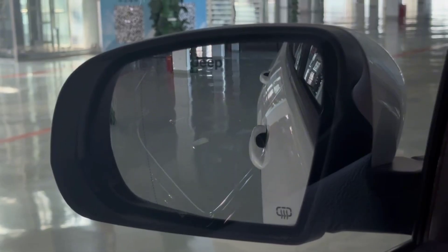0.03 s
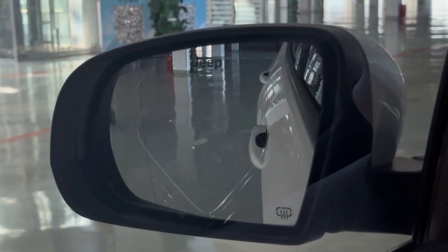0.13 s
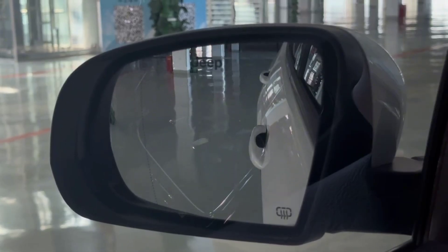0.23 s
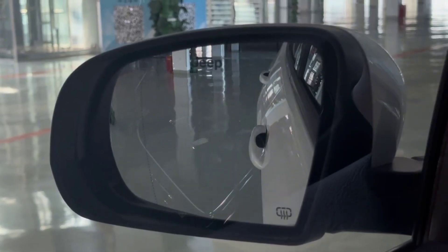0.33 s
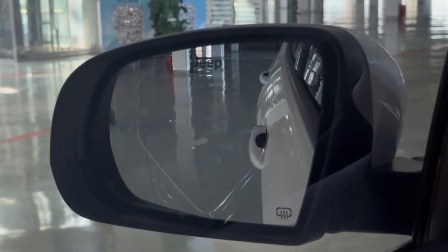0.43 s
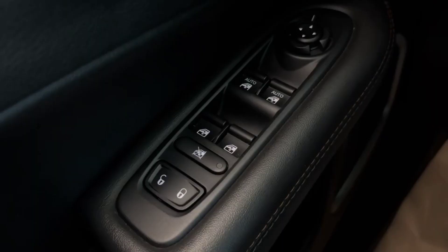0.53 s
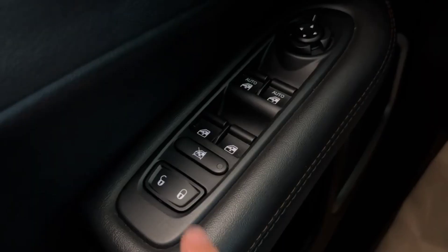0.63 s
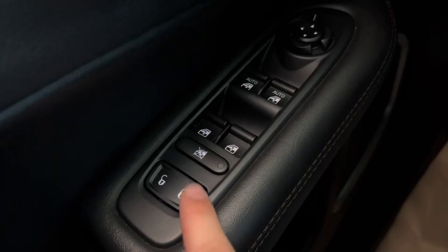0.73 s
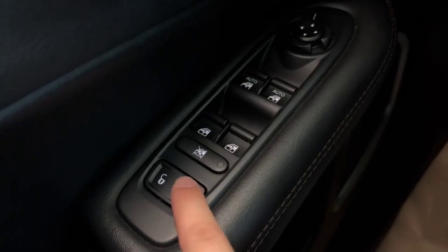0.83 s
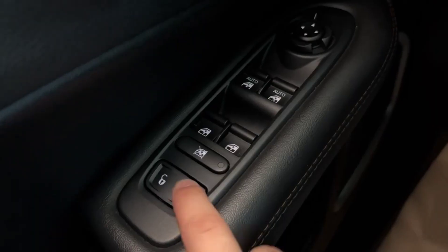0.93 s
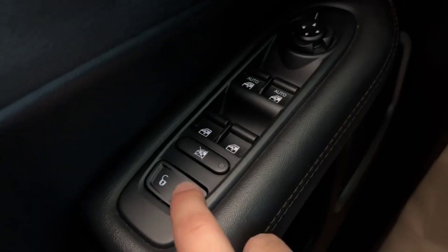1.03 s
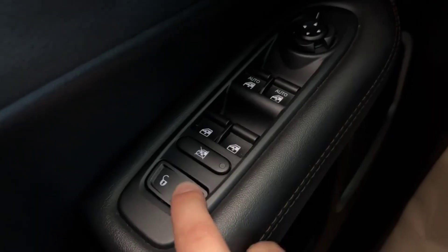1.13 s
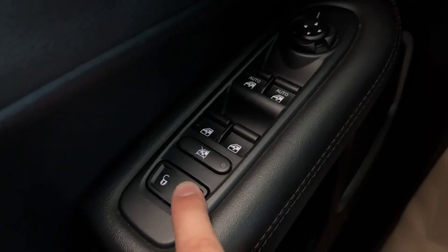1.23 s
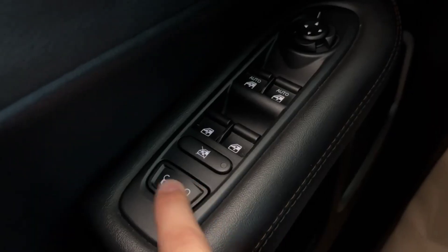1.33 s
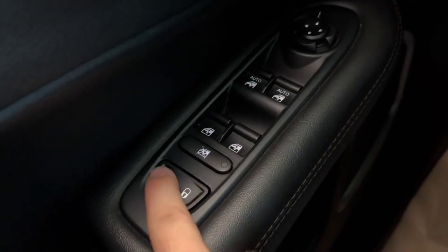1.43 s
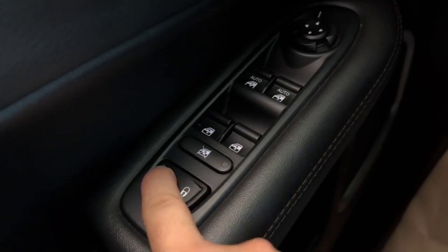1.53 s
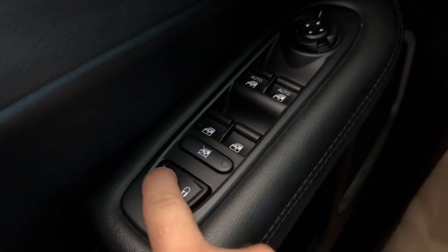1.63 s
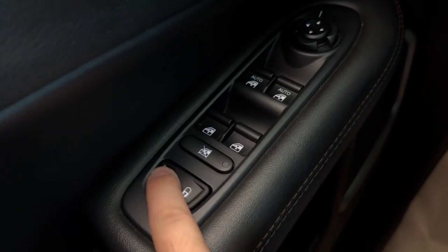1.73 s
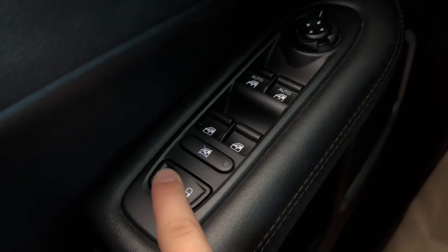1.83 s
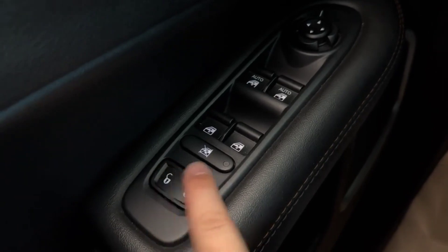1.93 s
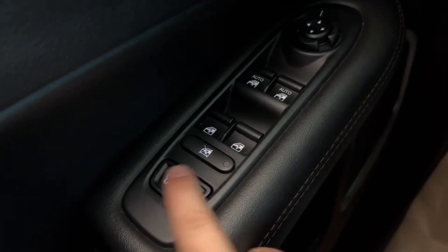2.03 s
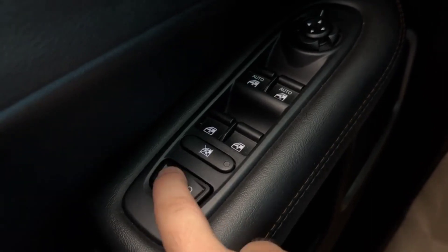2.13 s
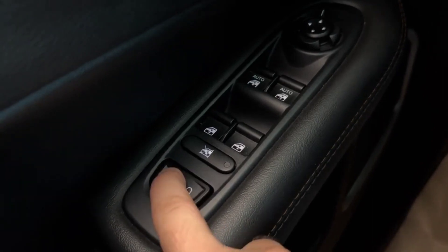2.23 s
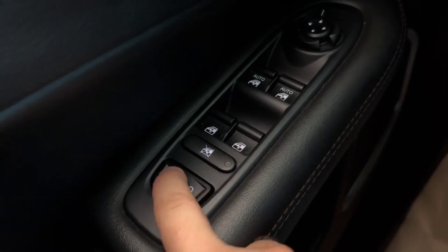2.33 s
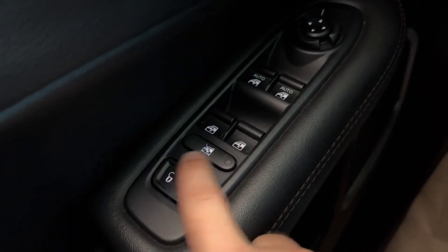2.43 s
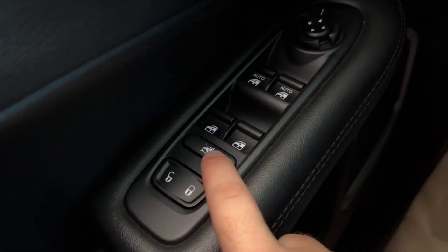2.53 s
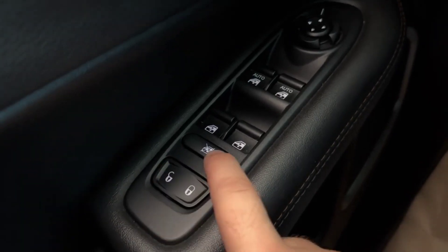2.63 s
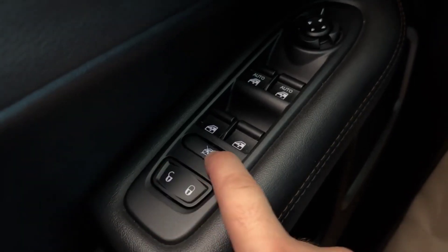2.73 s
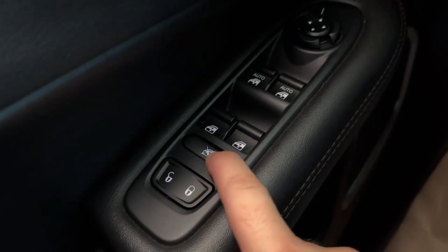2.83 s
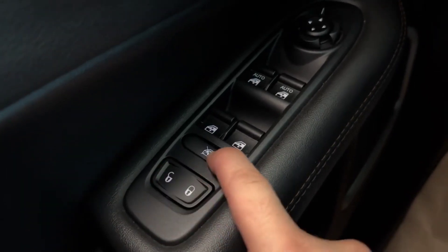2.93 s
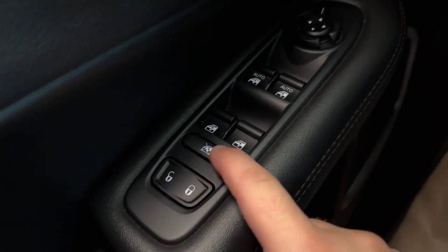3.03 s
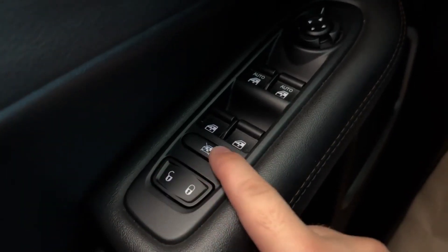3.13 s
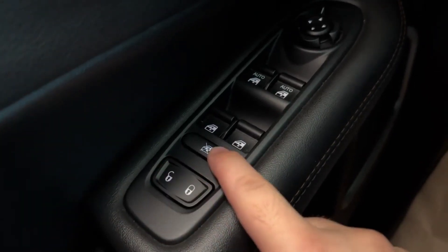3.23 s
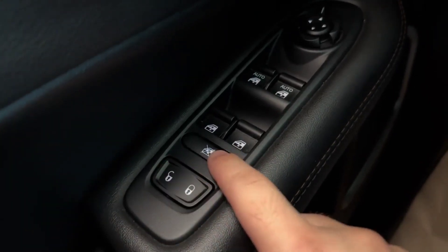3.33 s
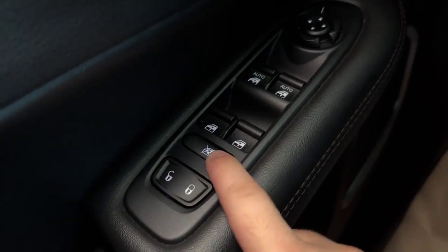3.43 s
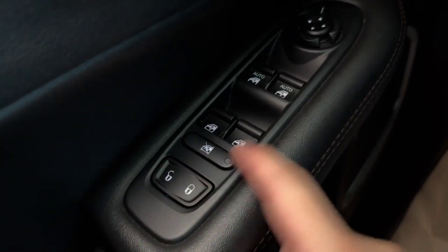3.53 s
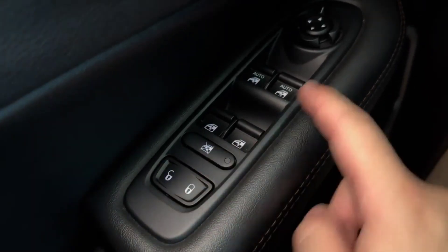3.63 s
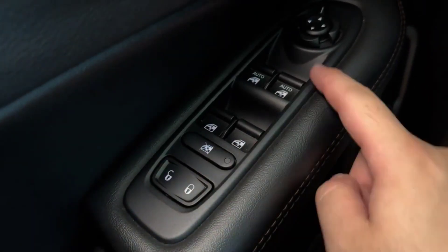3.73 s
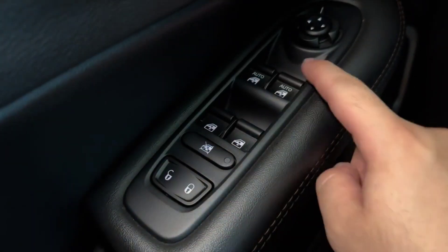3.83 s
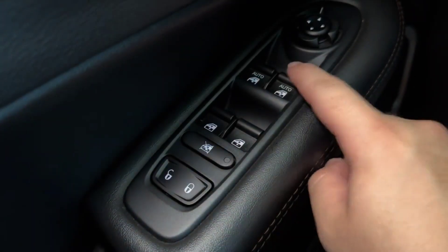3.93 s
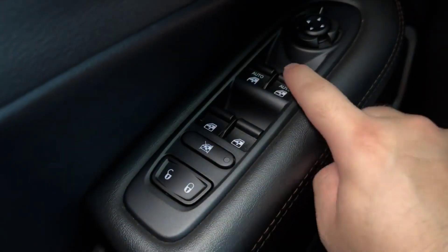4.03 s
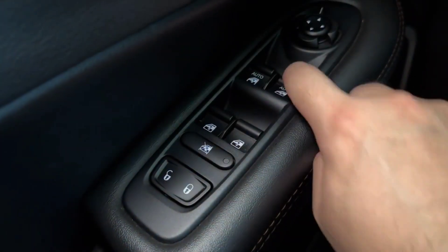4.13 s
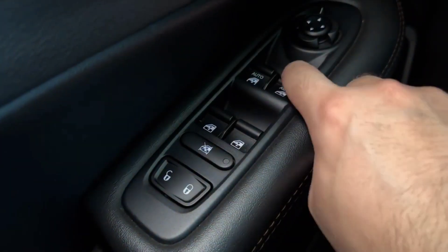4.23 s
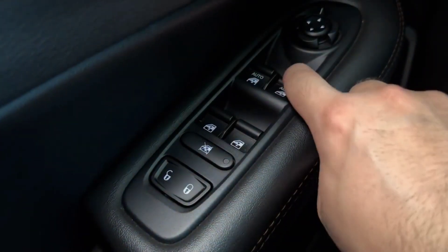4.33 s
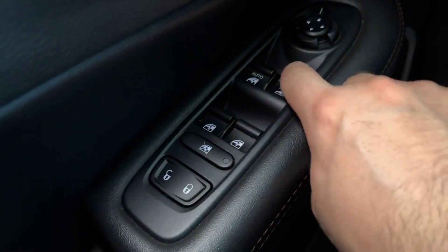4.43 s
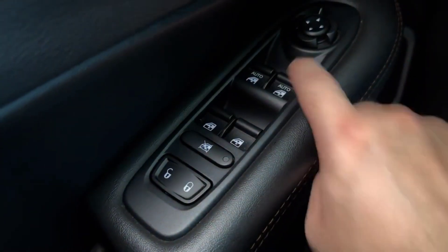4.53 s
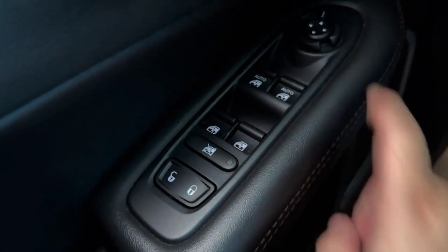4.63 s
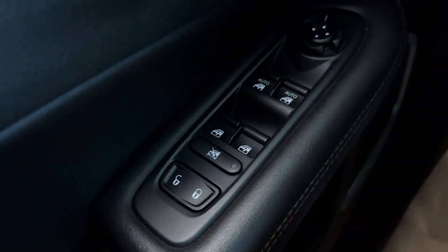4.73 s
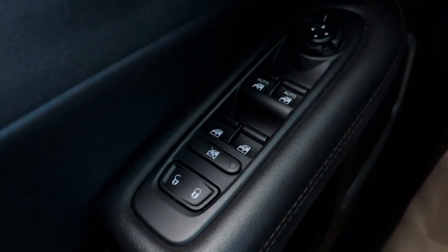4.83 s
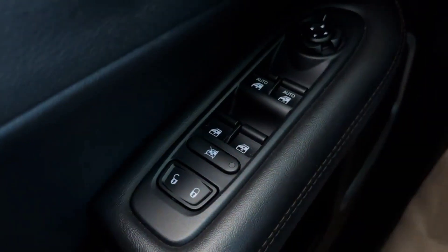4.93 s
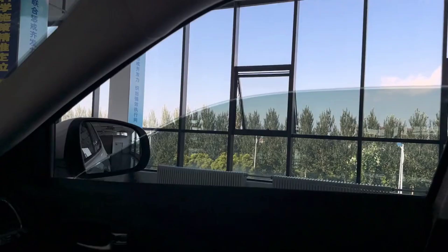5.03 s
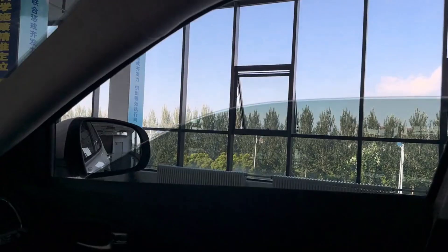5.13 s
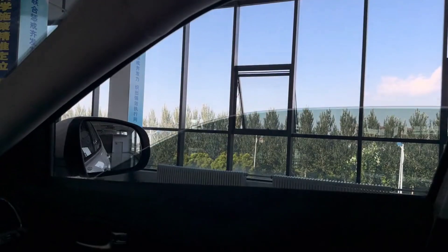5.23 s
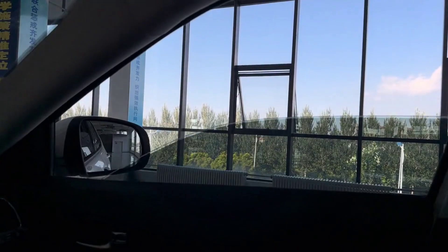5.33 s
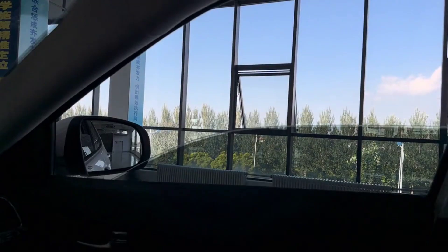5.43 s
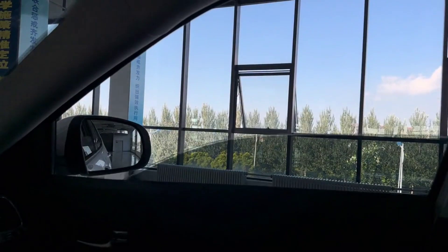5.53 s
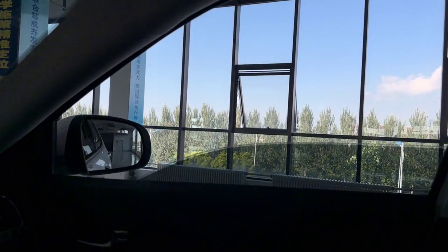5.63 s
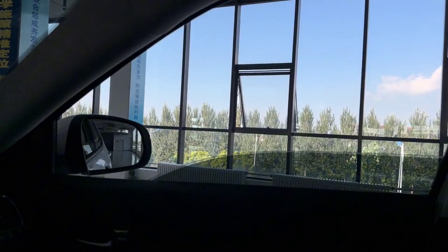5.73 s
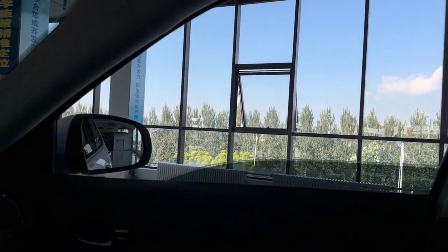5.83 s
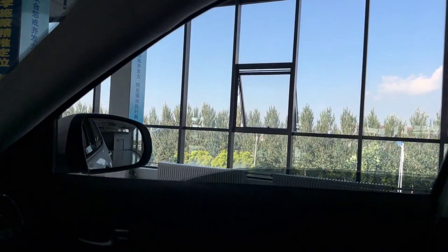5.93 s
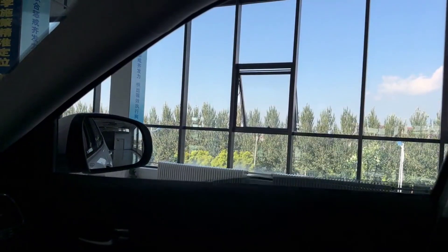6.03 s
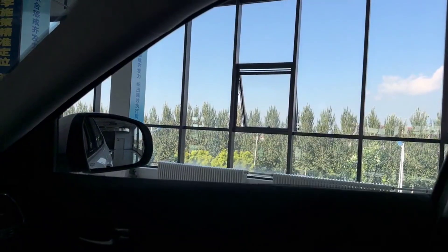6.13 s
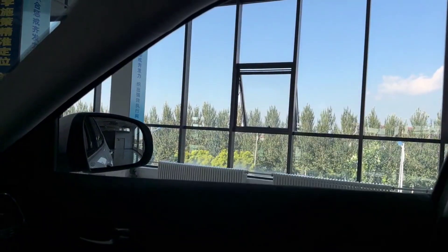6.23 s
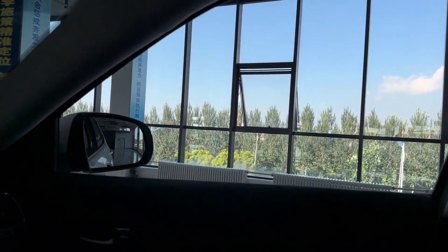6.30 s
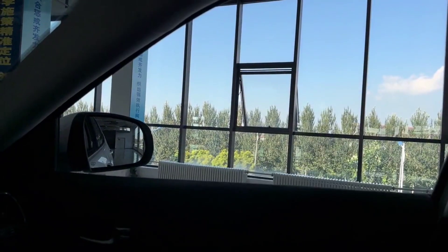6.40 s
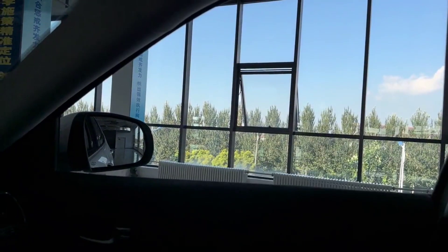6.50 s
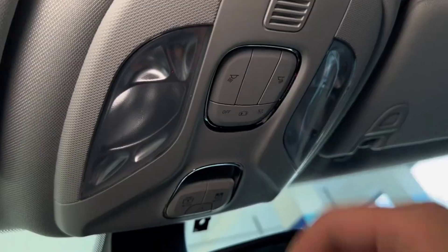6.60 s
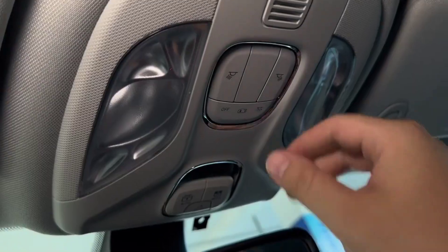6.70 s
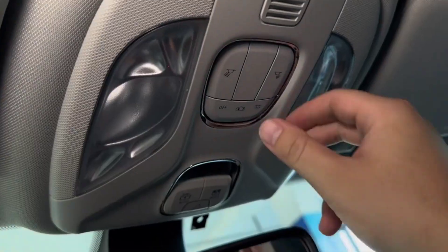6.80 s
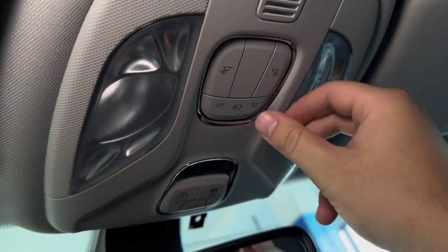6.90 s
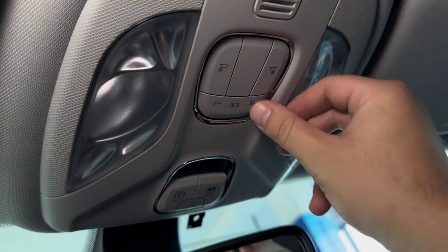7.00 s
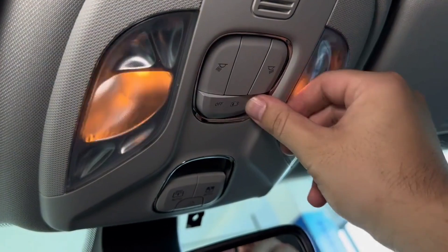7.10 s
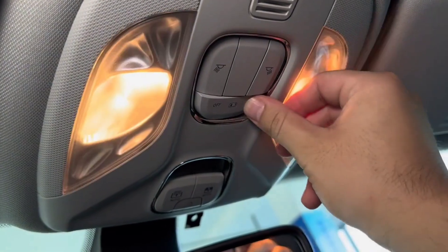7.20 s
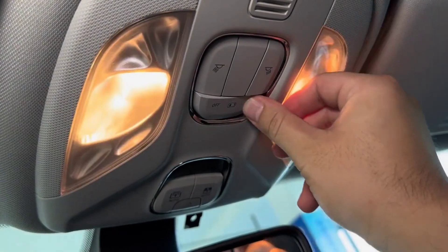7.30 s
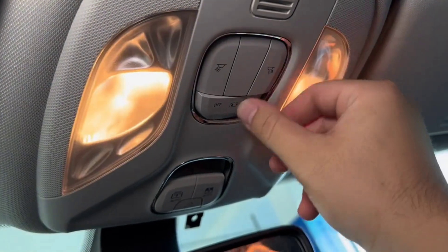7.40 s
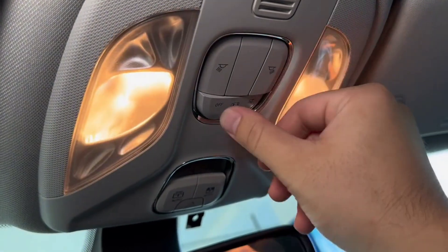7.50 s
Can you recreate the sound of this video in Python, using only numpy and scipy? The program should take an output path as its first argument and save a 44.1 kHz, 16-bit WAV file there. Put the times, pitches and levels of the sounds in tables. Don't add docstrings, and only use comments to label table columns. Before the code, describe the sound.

Very close in a quiet parked car, a finger snaps a lock rocker; its drive rattles and slams with a low door thud. Smaller knocks and a second lock clunk follow, then light button clicks. After a short trim creak, the window motor hums low, turns to a thinner whine and hiss in a more distant view, and stops with soft knocks. Finally a muted roof-light switch clicks in near silence.

```python
import sys
import numpy as np
from scipy import signal
from scipy.fft import rfft, irfft
from scipy.io import wavfile
from scipy.ndimage import uniform_filter1d

SR = 44100
rng = np.random.default_rng(int(sys.argv[2]) if len(sys.argv) > 2 else 0)


def digitize_waveform(pressure):
    field = np.atleast_2d(pressure).T
    bounded = np.clip(field, -1, 1)
    quanta = np.round(bounded * 32767).astype(np.int16)
    wavfile.write(sys.argv[1], SR, quanta)


def natural_amplitude(level_db):
    exponent = np.asarray(level_db, float) / 20
    return 10 ** exponent


N = 333396
TIME = np.arange(N) / SR

# frequency in Hz, level in dB, t60 in s.
PLASTIC_MODES = [(1357, 2.5, 0.044), (1583, -3, 0.028), (2030, -15, 0.083), (4030, -9, 0.0067)]
PANEL_MODES = [(329, -10, 0.055), (391.5, -11, .07), (451.7, -10, 0.11), (518, -4, 0.036), (615, -4, 0.018),
               (742, -12, 0.044), (870, -8.5, 0.034)]
DOOR_MODES = [(97.3, -5.5, 0.47), (115, -2, 0.3), (154.3, -4.5, 0.3), (176, -2, 0.24), (201, 2.5, 0.14),
              (241.6, -3, 0.2), (283, -6.5, 0.24)]
# lower edge in Hz, upper edge in Hz.
BANDS_HZ = [(1000, 4000), (300, 1000), (70, 300), (3000, 13000)]


def unit(x):
    return x / np.sqrt(np.mean(x ** 2))


def band(x, lo_hz, hi_hz):
    return signal.sosfilt(signal.butter(2, [lo_hz, hi_hz], "bandpass", fs=SR, output="sos"), x)


def gain_at(table):
    hz, db = np.transpose(table)
    grid_hz = np.arange(N // 2 + 1) * SR / N
    return natural_amplitude(np.interp(np.log(grid_hz + 1), np.log(hz), db))


def coloured(table):
    return unit(irfft(rfft(rng.standard_normal(N)) * gain_at(table), N))


def walk(rate):
    k = int(SR / rate)
    held = np.repeat(rng.standard_normal(N // k + 1), k)
    return unit(uniform_filter1d(uniform_filter1d(held, k), k)[:N])


def gate(start, length, rise_s, fall_s):
    return np.clip(np.minimum((TIME - start) / rise_s, (start + length - TIME) / fall_s), 0, 1)


def ring(modes, t, scatter_db=5.0, detune=0.023):
    hz, db, t60 = np.array(modes).T[:, :, None]
    level, shift, sign = rng.standard_normal((3, len(modes), 1))
    decay = natural_amplitude(db + scatter_db * level - 60 * t / t60)
    wave = np.sin(2 * np.pi * hz * (1 + detune * shift) * t)
    out = np.sum(decay * wave * np.sign(sign + .5), axis=0)
    return out / np.abs(out).max()


def blows(events, modes, clatter_db, rise_s, door_db, t60, scatter_db=7.0):
    out, t = np.zeros(N + SR), TIME[:SR // 4]
    fade = natural_amplitude(-60 * t / np.clip(t60, .01, .5)) * (1 - np.exp(-t / rise_s))
    fade *= 1 + 2.7 * np.exp(-t / 0.00061)
    for s, db, thud_db, top_db in events:
        rough_db = 3.7 * rng.standard_normal(len(t) // 64 + 1).repeat(64)[:len(t)]
        grit = rng.standard_normal(len(t)) * natural_amplitude(rough_db) * fade
        mid, top = band(grit, *BANDS_HZ[0]), band(grit, *BANDS_HZ[3])
        hit = ring(modes, t, scatter_db, 0.0045 * scatter_db)
        hit += natural_amplitude(clatter_db) * mid / np.abs(mid).max()
        hit += natural_amplitude(top_db) * top / np.abs(top).max()
        hit += natural_amplitude(thud_db) * ring(PANEL_MODES, t, 0.66 * scatter_db) * (1 - np.exp(-t / 0.0017))
        hit += natural_amplitude(thud_db + door_db) * ring(DOOR_MODES, t) * (1 - np.exp(-t / 0.0084))
        i = int(s * SR)
        out[i:i + len(t)] += natural_amplitude(db) * hit
    return out[:N]


def rocker():
    # start in seconds, snap peak in dB, panel thud in dB re snap, sizzle in dB re snap.
    flips = [
        (0.9525, -5, -14.5, -15.5),
        (1.295, -40.5, 6.5, -20),
        (1.514, -25, 6, -6.5),
        (1.6358, -26, -10, -10.5),
        (1.7458, -23, 2, 6),
        (1.8187, -32.5, 3.5, -13.5),
        (2.1347, -22, 1.5, -8),
        (2.378, -23, 5, 3),
    ]
    # frequency in Hz, level in dB, t60 in s.
    rocker_modes = [(510, -11, .045), (585, -16, .03), (1770, -2, .012), (1960, -3, .009), (2200, -5, .008),
                    (2450, -4, .009), (2750, -4, .008), (3050, -9, .007), (4300, -17, .008)]
    return blows(flips, rocker_modes, -14.0, 0.000067, door_db=-2.5, t60=0.038, scatter_db=2.0)


def lock_slams():
    # start in seconds, snap peak in dB, panel thud in dB re snap, sizzle in dB re snap.
    slams = [(0.0199, -45.5, 6, -4), (0.0508, -50, 9, -21), (1.0271, -40, 15, -22.5),
             (1.076, -17.5, -9.5, -18.5), (1.1049, -13.5, -7, -12.5), (1.4062, -44.5, 14.5, -22),
             (1.4481, -44.5, 11, -17), (2.2089, -39, 4.5, -7), (2.2563, -24.5, -9, 6.5),
             (2.2634, -17, -11.5, -19.5), (2.2702, -13.5, -7.5, -33.5)]
    return blows(slams, PLASTIC_MODES, 1.2, 0.0003, door_db=7.0, t60=0.087)


def button():
    # start in seconds, snap peak in dB, panel thud in dB re snap, sizzle in dB re snap.
    clicks = [(2.5228, -54, 15.5, -22.5), (2.5501, -51, 12, -30.5), (2.5952, -45, 19, -12),
              (2.6409, -58, 23, -31), (2.6973, -47.5, 7, -10), (2.9842, -27, 1, 0), (3.0065, -23, -1, -17),
              (3.033, -33, 8, -4), (3.245, -30, 8.5, -9.5), (3.267, -44, 16, -24.5), (3.3024, -50, 11, -20),
              (3.32, -34.5, 2.5, -9), (3.333, -36, 14, -23), (3.3486, -39.5, 8, 6.5),
              (3.483, -37.5, 12.5, 2.5), (3.5101, -23, -2, -2), (3.5226, -25.5, 0, -18)]
    # frequency in Hz, level in dB, t60 in s.
    button_modes = [(960, -24, .14), (1130, -27, .1), (2640, -31, .1), (870, -18, .05), (1500, -8, .022),
                    (2670, -6, .014), (3980, -20, .02)]
    return blows(clicks, button_modes, 0.92, 0.00009, door_db=-2.0, t60=0.061)


def window_lever():
    # start in seconds, snap peak in dB, panel thud in dB re snap, sizzle in dB re snap.
    knocks = [(3.7305, -54, 5.5, -7), (3.7815, -39.5, 6.6, -19), (3.9482, -47.5, 10.7, -15),
              (4.029, -50, 3, -22), (4.0891, -54.5, 9, -18), (4.159, -52, 3, -33),
              (4.1734, -45.5, 17.4, -20), (4.2144, -40, 15.2, -14), (4.2764, -35, 19.5, -33),
              (5.7994, -48, 2, -22), (6.16, -45, 14, -8), (6.1951, -53, 13, -42),
              (6.2911, -52.5, 10.5, -14)]
    return blows(knocks, PLASTIC_MODES, -0.91, 0.00028, door_db=2.5, t60=0.15)


def roof_switch():
    # start in seconds, snap peak in dB, panel thud in dB re snap, sizzle in dB re snap.
    snaps = [
        (6.7675, -53, 4, -3),
        (7.0389, -27.5, 3.7, -6),
        (7.3422, -52, 13.6, -8),
    ]
    return blows(snaps, PLASTIC_MODES, 0.93, 0.0013, door_db=-6, t60=0.067)


def contacts():
    # start in seconds, snap peak in dB, panel thud in dB re snap, sizzle in dB re snap.
    ticks = [
        (.860, -50.5, -5.5, -9.5),
        (.933, -41.5, -3, 0),
        (1.712, -61, 15, -30),
        (2.119, -42.5, -1, -12),
        (2.236, -37, -5, -15),
        (2.360, -35, 6, -1),
        (4.01, -60, -3, -20),
        (5.062, -40, 2, 0),
    ]
    catches = [
        (1.1755, -30.5, -18, 5.5),
        (2.737, -31, -3.5, 7),
        (4.053, -33, 4, -6.5),
        (4.284, -27.5, -4, -6),
        (4.539, -25.5, -1.5, -11),
        (7.103, -37, -9.5, -18),
    ]
    # frequency in Hz, level in dB, t60 in s.
    catch_modes = [(2500, -6, .008), (3600, -2, .008), (4700, -3, .008), (5800, -5, .008), (7700, 0, .014)]
    out = blows(ticks, PLASTIC_MODES, 1.3, .0003, door_db=-5, t60=.05)
    return out + blows(catches, catch_modes, -0.74, 0.00085, door_db=4.5, t60=0.044)


def scrape(strokes, per_s, spread_db, smooth_db, door_db, top_db, soft, rise_s, patchy_db=2.5):
    gain, push, deep, thin = np.zeros((4, N))
    for s, length, from_db, to_db, body_db in strokes:
        stroke, span = np.zeros(N), slice(int(s * SR), int((s + length) * SR))
        level_db = np.interp(TIME[span], [s, s + length], [from_db, to_db])
        stroke[span] = gate(s, length, rise_s, 0.011)[span] * natural_amplitude(level_db)
        gain += stroke
        push += natural_amplitude(body_db) * stroke
        deep += natural_amplitude(door_db + (1 + soft) * body_db) * stroke
        thin += natural_amplitude(top_db - soft * body_db) * stroke
    slips = (rng.random(N) < per_s / SR) * natural_amplitude(spread_db * rng.exponential(size=N)) * rng.standard_normal(N)
    drive = unit(unit(slips) + natural_amplitude(smooth_db) * rng.standard_normal(N)) * natural_amplitude(patchy_db * walk(70))
    skin = np.zeros(N)
    for force, modes in ((push, PANEL_MODES), (deep, DOOR_MODES)):
        response = ring(modes, TIME[:SR // 3], 0., 0.)
        skin += signal.fftconvolve(force * drive, response / np.linalg.norm(response))[:N]
    mid = unit(band(band(drive, 870, 1800), 900, 4200))
    top = unit(band(drive, *BANDS_HZ[3]))
    return gain * mid + thin * top + skin


def lock_gears():
    # start in s, length in s, scrape at start in dB, at end in dB, panel push in dB re scrape.
    drive_strokes = [(1.02, 0.066, -46, -42, 11), (1.072, .034, -21.5, -29, 1.5),
                     (1.1, .03, -18.5, -38, -1), (1.118, 0.032, -34, -44, 10),
                     (1.141, 0.034, -43, -66.5, 10.5), (1.176, .04, -53, -72, 10),
                     (1.3, 0.14, -77, -71, 11.5), (2.197, .02, -54.5, -48.5, 0.5),
                     (2.208, 0.057, -43.5, -41.5, 11), (2.25, 0.026, -29, -21.5, -2),
                     (2.268, 0.073, -21, -57.5, 1)]
    return scrape(drive_strokes, 1500, 1.3, -1.6, door_db=-12, top_db=-0.5, soft=1.0, rise_s=0.0034)


def finger_drag():
    # start in s, length in s, scrape at start in dB, at end in dB, panel push in dB re scrape.
    drag_strokes = [(.79, .14, -65.5, -81, 10), (1.83, 0.15, -74, -78, 4.5), (2.0, 0.095, -72.5, -73, 9),
                    (2.6, 0.065, -59.5, -65, 11), (2.685, 0.049, -58, -58, 10),
                    (2.755, 0.11, -62, -100.5, 14.7), (2.968, 0.022, -68, -46.5, 5.5),
                    (3.72, 0.056, -75.5, -58.5, 7), (4.16, 0.12, -57.5, -55, 14),
                    (6.571, 0.14, -75.5, -82, -2), (.06, .14, -81.5, -79.5, 7.5),
                    (3.776, 0.05, -58, -58, 11.5), (7.102, 0.072, -60, -96, 1.5),
                    (6.77, 0.071, -73, -84, 13), (7.012, 0.042, -65.5, -49, 9),
                    (7.045, 0.054, -49, -67.5, 9), (4.19, 0.045, -56, -50, 4), (4.232, .05, -58, -59, 5),
                    (2.74, .04, -56, -66, 0), (4.09, .07, -76, -72, 6), (4.29, 0.12, -56, -57, 1)]
    return scrape(drag_strokes, 300, 0.85, 6.3, door_db=0.5, top_db=-2.5, soft=0.66, rise_s=0.0075)


def decaying_notes(table, rise_s):
    out = np.zeros(N)
    for s, hz, db, t60 in table:
        ringing = slice(int(s * SR) + 1, int((s + 1.5 * t60) * SR))
        t = TIME[ringing] - s
        out[ringing] += natural_amplitude(db - 60 * t / t60) * (1 - np.exp(-t / rise_s)) * np.sin(2 * np.pi * hz * t)
    return out


def booms():
    # start in seconds, frequency in Hz, peak in dB, t60 in s.
    boom_notes = [(0.0302, 130.7, -33.5, 0.38), (1.137, 181.2, -12, 0.21), (1.181, 67, -24, 0.38),
                  (2.312, 173.6, -11.5, 0.12), (4.209, 110, -13, 0.12), (4.291, 61, -16.5, 0.18),
                  (4.275, 464, -18, 0.036), (3.513, 280, -29, .12), (3.34, 330, -36, .1),
                  (7.045, 300, -35, .09), (6.775, 300, -52, .12), (4.555, 220, -33, .08),
                  (2.99, 95, -36, .2), (6.16, 200, -30, 0.22), (6.194, 990, -29.5, 0.027),
                  (6.293, 1140, -36, 0.026), (7.057, 42, -24, 0.51), (7.05, 41, -36.5, 0.43),
                  (0.88, 125, -40, .2), (4.2, 200, -46, 0.21), (4.32, 57, -21.5, 0.37)]
    return decaying_notes(boom_notes, 0.0033)


def pings():
    # start in s, frequency in Hz, peak in
    # dB, t60 in s.
    lock_notes = [(.0205, 7370, -44, 0.025), (.0205, 2920, -51, 0.034), (1.5135, 1875, -11.5, 0.016),
                  (1.516, 543, -23, .04), (1.7452, 1800, -9, 0.019), (1.7452, 1610, -19.5, 0.018),
                  (1.7452, 2140, -23, .03), (1.748, 920, -28.5, 0.029), (1.295, 1890, -33, 0.012),
                  (1.44, 1900, -26, .015), (1.464, 1910, -46, .02), (1.137, 297, -16.5, .05),
                  (1.8185, 1804, -23.5, 0.014), (1.823, 560, -37, 0.043), (2.378, 1850, -23.5, 0.026),
                  (4.03, 2030, -45, 0.03), (4.285, 2590, -35, 0.019), (1.078, 1290, -18, .03),
                  (1.084, 3400, -16, 0.023), (1.105, 1490, -16, 0.023), (1.4065, 4840, -41.5, 0.017),
                  (1.448, 1850, -27, 0.022), (1.721, 1840, -43, 0.015), (2.237, 3030, -32.5, .02),
                  (2.24, 2800, -30, 0.025), (2.12, 950, -35.5, .03), (2.522, 910, -44, 0.06),
                  (2.738, 2590, -37.5, 0.023), (2.76, 690, -41, 0.038), (2.2695, 1658, -7, 0.022),
                  (2.267, 3800, -18, .015), (2.294, 3710, -32, 0.025)]
    switch_notes = [(2.55, 2630, -47.5, 0.049), (2.598, 900, -36.5, 0.067), (2.738, 3750, -27.5, 0.017),
                    (2.985, 2550, -26.5, 0.022), (2.985, 4040, -37, .025), (3.007, 1990, -24, .025),
                    (3.034, 928, -47.5, 0.19), (3.034, 1840, -63, .25), (3.034, 1235, -28.5, .03),
                    (3.034, 3980, -64, .14), (3.034, 2640, -63, .2), (3.32, 2620, -42, .025),
                    (3.246, 2000, -34, 0.026), (3.334, 2620, -49, .03), (3.349, 2640, -43, 0.028),
                    (3.349, 3760, -35.5, 0.029), (3.35, 1120, -63, 0.47), (3.484, 2050, -41, .03),
                    (3.524, 1500, -28, 0.024), (3.524, 2110, -32, .025), (3.268, 945, -29, .05),
                    (3.525, 1820, -65, 0.54), (3.525, 943, -51, 0.32), (4.204, 1500, -42.5, .05),
                    (4.175, 850, -36, .05), (7.041, 1350, -34, 0.049), (6.158, 730, -36, .04),
                    (6.158, 340, -36, .06), (6.585, 1450, -72, .6), (6.77, 380, -52, .09),
                    (3.95, 1300, -40, .025), (2.598, 1300, -44, .03), (2.603, 600, -34, .04),
                    (5.8, 850, -50, .04), (3.51, 1500, -34, .025)]
    return decaying_notes(lock_notes, 0.0005) + decaying_notes(switch_notes, 0.0005)


def motor():
    # time in s, shaft rate in Hz.
    shaft_rate = [(4.3, 90.4), (4.382, 90.6), (4.51, 93.68), (4.9, 94), (5.06, 95.64), (5.07, 95.9),
                  (5.3, 95.66), (5.62, 96.53), (5.9, 98.4), (6.16, 99.6)]
    # multiple of the shaft, near level in dB re hum, far level in dB re hum.
    overtones = [(2, -13, -9), (3, -19, -15), (4, -31, -26), (5, -29, -27.5), (8, -43, -41)]
    # multiple of the shaft, level in dB re whine.
    teeth = [(8, -21), (14, -28), (17, -25), (19, -25)]
    # start in s, end in s, hum in dB, whine in dB, hiss at the start in dB.
    runs = [
        (4.268, 5.06, -33.5, -63.5, -52.5),
        (5.068, 6.166, -43, -51.5, -55),
    ]
    # dB a second, per run.
    hiss_ease = [9.5, 4.5]
    # frequency in Hz, level in dB per Hz.
    hiss_near = [(120, -14.5), (200, -18.5), (750, -37), (1200, -44), (6500, -41.5), (10000, -51),
                 (16000, -57)]
    hiss_far = [(120, -12), (200, -8.5), (630, -25), (1100, -22.5), (2500, -30), (7600, -37.5),
                (10000, -38.5), (16000, -47.5)]
    free_s, loaded_s, octave_db = 5.82, 6.08, -17
    full_s, swell_db_s = 4.62, 99
    out = np.zeros(N)
    hz = np.interp(TIME, *np.transpose(shaft_rate))
    slack_db = swell_db_s * np.minimum(TIME - full_s, 0)
    running_free = np.minimum(np.minimum(TIME - free_s, loaded_s - TIME), 0)
    for run, (row, ease_db, hiss) in enumerate(zip(runs, hiss_ease, (hiss_near, hiss_far))):
        start, end, hum_db, whine_db, hiss_db = row
        turn = 2 * np.pi * np.cumsum(hz * (1 + .002 * walk(18) + .002 * walk(5))) / SR
        hum = np.sin(turn) * natural_amplitude((0.7 + 0.9 * run) * walk(19))
        for k, *db in overtones:
            hum += natural_amplitude(db[run] + 1.54 * walk(25)) * np.sin(round(k) * turn + k * k)
        whine = np.sin(10 * turn) * natural_amplitude(1.5 * walk(40))
        octave = np.sin(20 * turn) + .5 * (TIME > 6) * np.sin(30 * turn)
        whine += natural_amplitude(2.5 * walk(12) + octave_db + 300 * running_free) * octave
        for k, db in teeth:
            whine += natural_amplitude(db + 3.9 * walk(7.8)) * np.sin(round(k) * turn)
        noise = coloured(hiss) * (1 + .25 * np.sin(turn)) * natural_amplitude(.4 * walk(6) + .8 * walk(40))
        noise /= np.std(band(noise, 1200, 8000))
        tonal = np.sqrt(2) * (natural_amplitude(hum_db + slack_db) * hum + natural_amplitude(whine_db) * whine)
        hissing = natural_amplitude(hiss_db - ease_db * (TIME - start)) * noise
        out += gate(start, end - start, .003, .003) * (tonal + hissing)
    return out


def creak():
    # start in s, length in s, buzz in dB, slips a second at start, at end.
    creaks = [
        (1.378, 0.1, -49, 152, 145),
        (3.775, .18, -50.5, 135, 78),
    ]
    # panel, door, sizzle in dB re buzz, change of sizzle by the end in dB.
    bodies = [
        (12.5, 19.5, -16.5, 9.5),
        (2.5, 17.5, -14, -8),
    ]
    # frequency in Hz, level in dB, t60 in s.
    part_modes = [
        [(900, -2, .008), (1300, -2, .008), (1750, -2, .009), (2150, -2, .009)],
        [(950, 0, .015), (1500, -4, .008), (2000, -5, .008), (2650, -7, .007), (3200, -10, .005),
         (3800, -9, .007)],
    ]
    jitters = [.05, .22]
    rubs = [4, .1]
    swells = [.02, .07]
    # start in s, length in s, depth in dB.
    grip_s, grip_length, grip_db = (3.868, 0.022, -11)
    rough, puff = .9, .14
    attack_s, release_s, linger_s, door_ease_db_s = 0.0042, 0.016, 0.055, 21
    out = np.zeros(N)
    for row, body, jitter, rub, modes, swell in zip(creaks, bodies, jitters, rubs, part_modes, swells):
        s, length, db, *rates = row
        panel_db, door_db, top_db, trend_db = body
        gripped = natural_amplitude(grip_db * gate(grip_s, grip_length, .004, 0.0037))
        gain = natural_amplitude(db) * gate(s, length, attack_s, release_s) * gripped
        trend = natural_amplitude(trend_db * np.clip((TIME - s) / length, 0, 1))
        per_s = np.interp(TIME, [s, s + length], rates)
        phase = np.cumsum(per_s * (1 + jitter * walk(120))) / SR
        slips = np.diff(np.floor(phase), prepend=0) * natural_amplitude(2.2 * walk(70))
        puffs = rub + np.exp(-(phase % 1) / puff)
        grit = puffs * natural_amplitude(2.0 * walk(60)) * rng.standard_normal(N)
        part = ring(modes, TIME[:SR // 20], 0., 0.)
        parts = [signal.fftconvolve(slips, part)[:N],
                 band(slips, 390, 540),
                 band(band(slips, 80, 220), 70, 260),
                 band(grit, 2600, 8000),
                 signal.fftconvolve(grit, part)[:N]]
        mid, panel, door, top, rasp = (p / np.std(p[gain > natural_amplitude(-90)]) for p in parts)
        out += gain * (np.sqrt(trend) * (mid + rough * rasp) + natural_amplitude(panel_db) * panel + natural_amplitude(top_db) * trend * top)
        shaking = gate(s - .01, length + linger_s, swell, release_s) ** .5
        easing = natural_amplitude(door_ease_db_s * np.minimum(s - TIME, 0))
        out += natural_amplitude(db + door_db) * shaking * natural_amplitude(1.1 * walk(25.25)) * easing * door
    return out


def slide():
    # start in s, length in s, hollow rub in dB, fine hiss in dB, rise as share of the length.
    slides = [
        (1.296, .09, -68, -66, .05),
        (1.37, 0.1, -75, -55, 0.76),
        (1.83, .14, -71, -64.5, 0.31),
        (1.997, .075, -73, -58.5, 0.48),
        (2.076, 0.017, -69, -76, .4),
        (1.70, 0.056, -72, -81, .8),
        (6.572, 0.13, -84, -84, .1),
        (7.1, 0.092, -81, -89, .05),
        (6.915, 0.018, -87, -95, .5),
    ]
    # lower edge in Hz, upper edge in Hz.
    rub_hz = (1680, 3300)
    hiss_hz = (8900, 15870)
    rub, hiss = np.zeros((2, N))
    for s, length, rub_db, hiss_db, rise in slides:
        rise = np.clip(rise, .02, .9)
        rub += natural_amplitude(rub_db) * gate(s, length, .006, .4 * length)
        hiss += natural_amplitude(hiss_db) * gate(s, length, rise * length, (1 - rise) * length * 0.99)
    noise = rng.standard_normal(N)
    hollow = rub * natural_amplitude(3.2 * walk(90)) * unit(band(noise, *rub_hz))
    return hollow + hiss * natural_amplitude(1.5 * walk(60)) * unit(band(noise, *hiss_hz))


def squeak():
    s, length, from_hz, to_hz, db = (6.645, .06, 6600, 5900, -84)
    hz = from_hz + (to_hz - from_hz) * np.clip((TIME - s) / length, 0, 1) ** 1.6
    tone = np.sin(2 * np.pi * np.cumsum(hz) / SR)
    return natural_amplitude(db + 2 * walk(80)) * gate(s, length, .01, .015) * tone


def sway():
    # time in s, peak in dB.
    lurches = [(0.03, -49), (.75, -57.5), (1.18, -31.5), (1.85, -49.5), (2.4, -36), (2.748, -49.5),
               (3.06, -46.5), (3.35, -50), (3.801, -44), (4.298, -28.5), (5.05, -49.5), (6.24, -41.5),
               (6.4, -66.5), (7.3, -53)]
    rise_db_s, fall_db_s, rest_db = 114.5, 63, -66
    level = natural_amplitude(rest_db)
    for s, db in lurches:
        level = level + natural_amplitude(db + np.minimum(rise_db_s * (TIME - s), fall_db_s * (s - TIME)))
    return level * unit(band(band(rng.standard_normal(N), 49, 160), 34, 73))


def background():
    # start in s, end in s.
    shots = [
        (0, .579),
        (.585, 5.06),
        (6.15, 6.569),
        (6.571, 7.6),
    ]
    air_levels = [-58.5, -63, -57, -72]
    # frequency in Hz, level in dB per Hz.
    air_spectra = [
        [(47, -29), (80, -7.5), (222, -25.5), (444, -36.5), (489, -26), (560, -46), (8000, -63.5), (12400, -66),
         (17600, -120)],
        [(47, -31.5), (80, -6.5), (254, -22), (666, -35.5), (1060, -33), (1160, -41.5), (8000, -56.5),
         (12400, -59.5), (17600, -120)],
        [(47, -35.5), (80, -9), (183, -3.5), (210, -18.5), (245, -9.5), (942, -14), (8000, -46.5), (12400, -56),
         (17600, -120)],
        [(47, -24), (80, -11), (280, -10.5), (381, -17), (1440, -30.5), (1560, -35), (8000, -44.5),
         (12400, -46.5), (17600, -120)],
    ]
    # shot number, frequency in Hz, level in dB.
    tones = [
        (0, 1090, -85),
        (1, 1090, -85),
        (0, 485, -80),
        (3, 1470, -82),
    ]
    out = np.zeros(N)
    gates = [gate(start, end - start, .004, .004) for start, end in shots]
    for shot, db, air in zip(gates, air_levels, air_spectra):
        out += shot * natural_amplitude(db + 1.2 * walk(26)) * coloured(air)
    for shot, hz, db in tones:
        out += gates[round(shot)] * natural_amplitude(db - 1.5 + 2.5 * walk(35)) * np.sin(2 * np.pi * hz * TIME)
    return out


def cabin(x):
    t, t60_s = TIME[:SR // 4], .11
    tail = rng.standard_normal(len(t)) * natural_amplitude(-60 * t / t60_s) * (t > .002)
    return signal.fftconvolve(x, tail / np.sqrt(np.sum(tail ** 2)))[:N]


def scene():
    # frequency in Hz, side minus mid in dB.
    stereo_width = [(25, -40), (60, -29), (125, -19.5), (250, -12.5), (500, -5.5), (1000, -5), (4000, -4.5),
                    (8000, -2)]
    cabin_db, diffuse_db = -16, 2.5
    near = rocker() + lock_slams() + button() + window_lever() + roof_switch() + contacts()
    near += lock_gears() + finger_drag() + booms() + creak() + squeak()
    mid = near + natural_amplitude(cabin_db) * cabin(near) + pings() + motor() + sway() + background()
    wander = natural_amplitude(diffuse_db) * (np.tanh(walk(250)) * mid + np.tanh(walk(40)) * cabin(mid))
    mid = mid + slide()
    side = irfft((-1j * rfft(mid) + rfft(wander)) * gain_at(stereo_width), N)
    return np.array([mid + side, mid - side])


def band_limit(x):
    return signal.sosfilt(signal.butter(12, 16790, fs=SR, output="sos"), x)


def record(dry):
    # frequency in Hz, gain in dB.
    port_response = [(4000, -0.5), (7800, 2.5), (8600, -6), (9300, -12), (9800, -0.5), (12700, -3),
                     (13400, -22.5), (14400, 4), (15300, 3.5), (15900, -31.5), (16800, -69)]
    ceiling = .92
    ported = irfft(rfft(dry) * gain_at(port_response), N)
    return band_limit(ceiling * np.tanh(ported / ceiling))


dry = scene()
out = record(dry)
digitize_waveform(out)
```